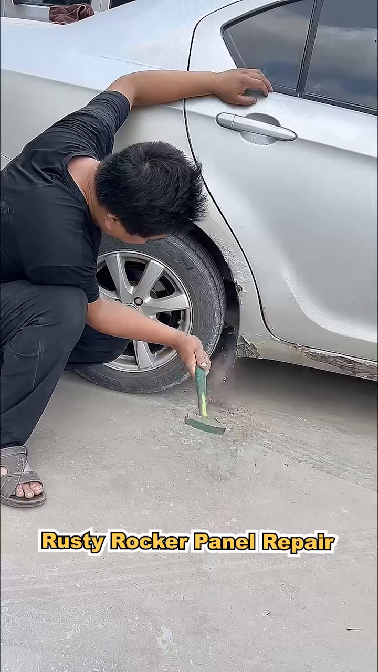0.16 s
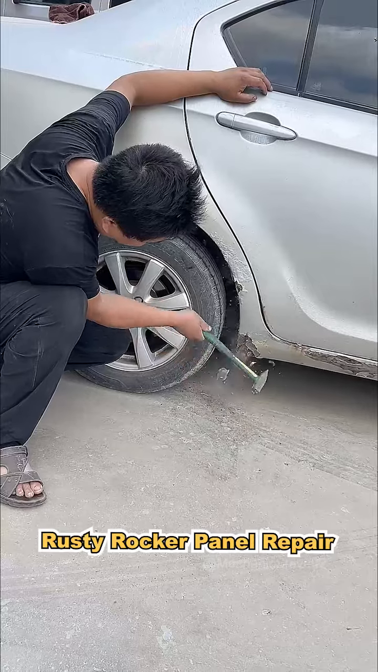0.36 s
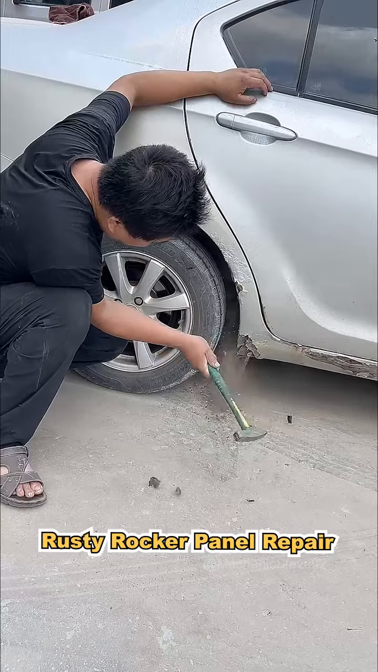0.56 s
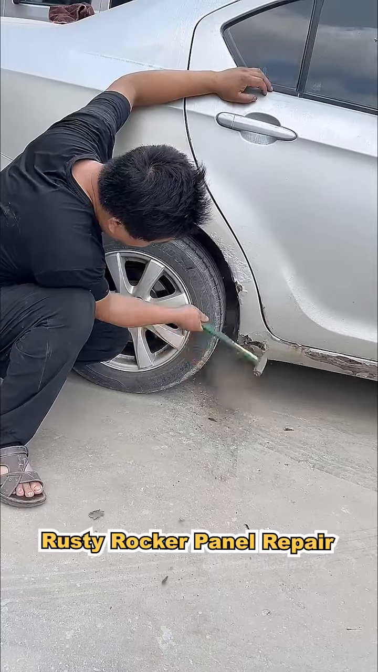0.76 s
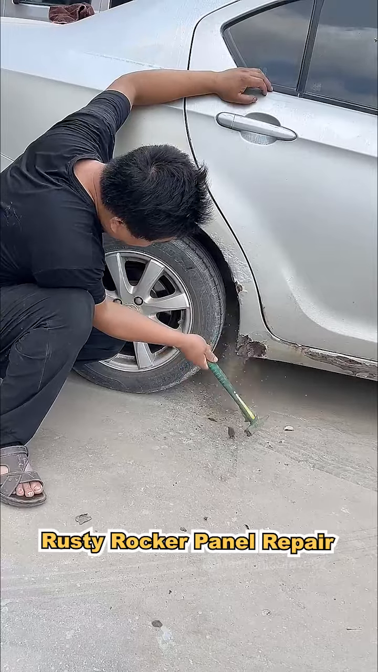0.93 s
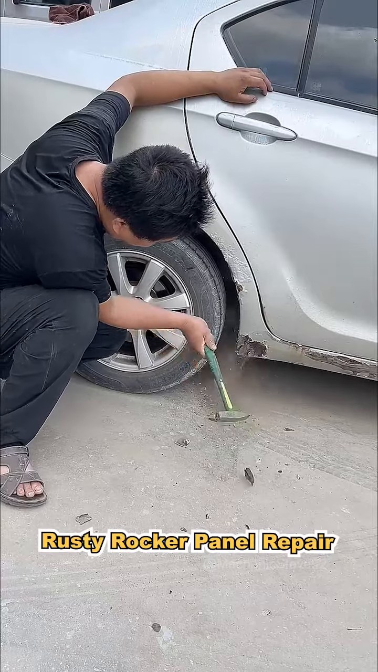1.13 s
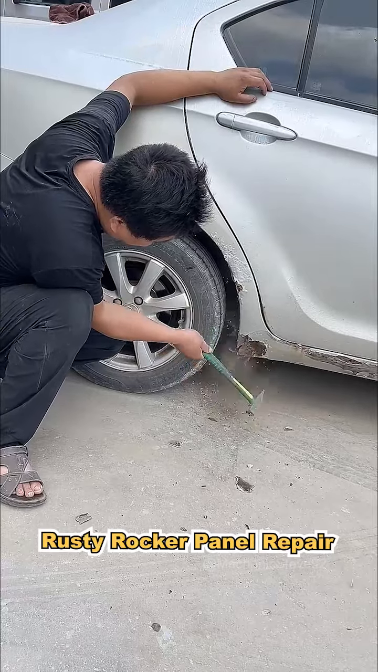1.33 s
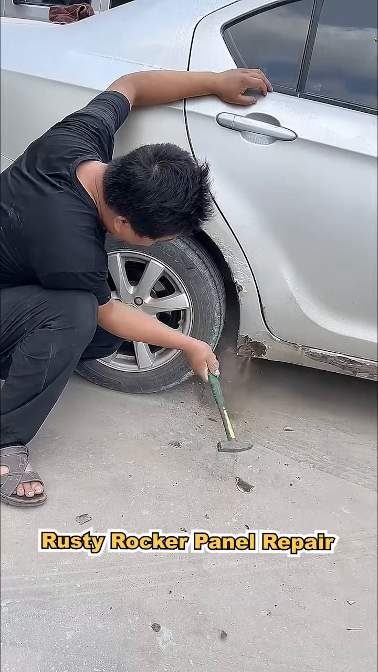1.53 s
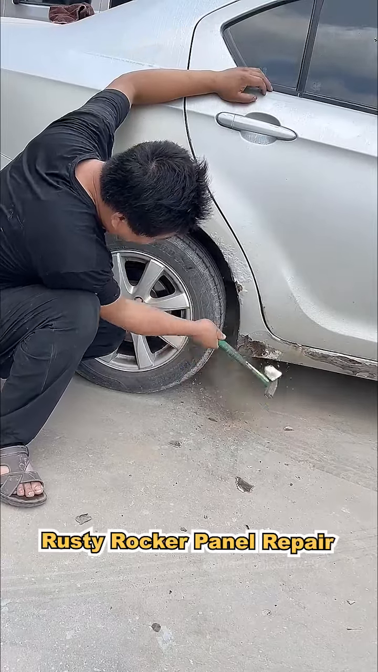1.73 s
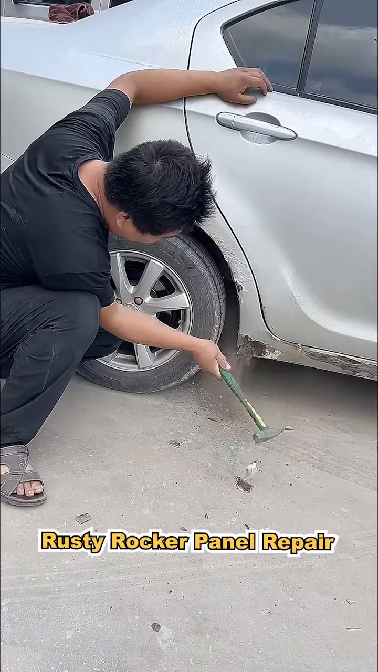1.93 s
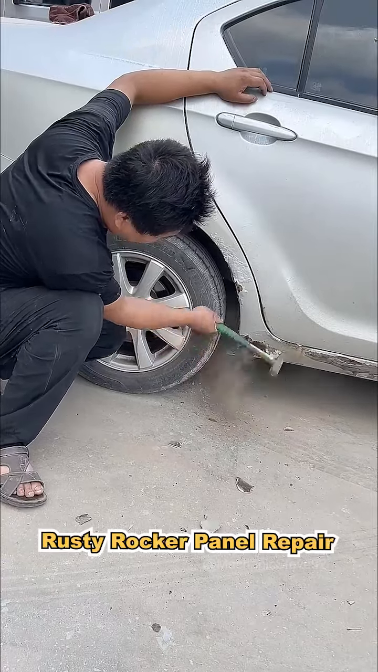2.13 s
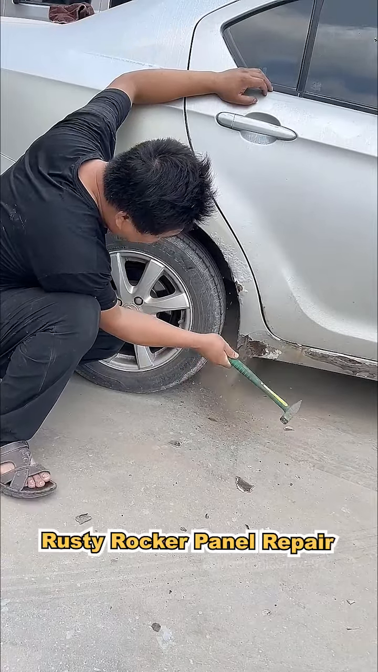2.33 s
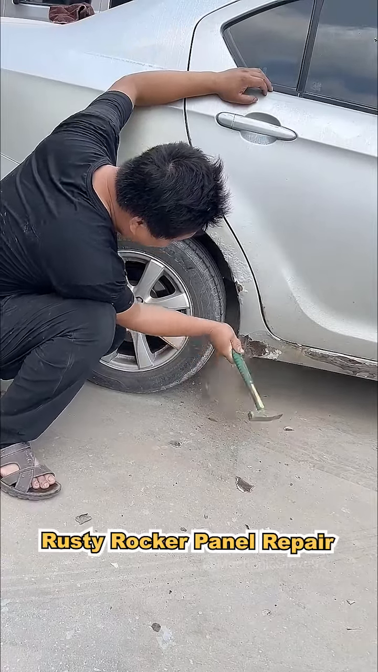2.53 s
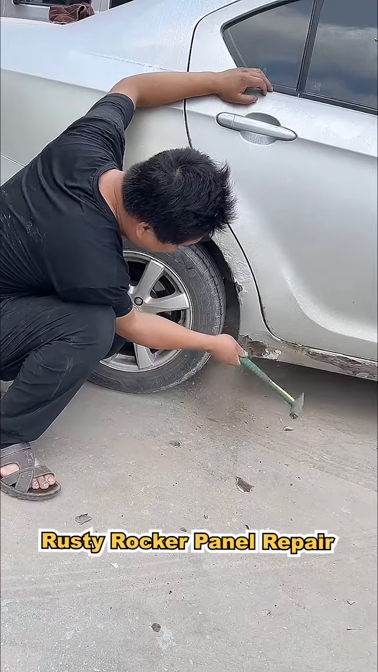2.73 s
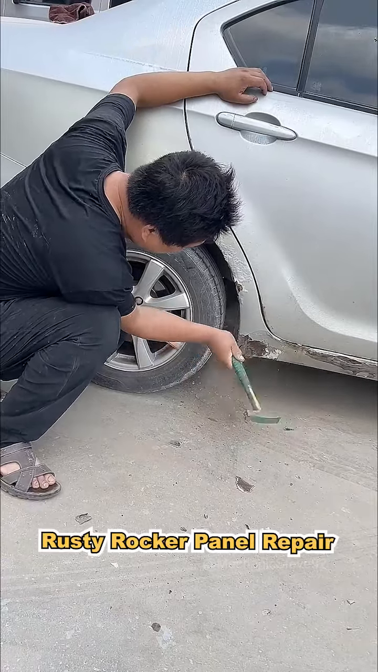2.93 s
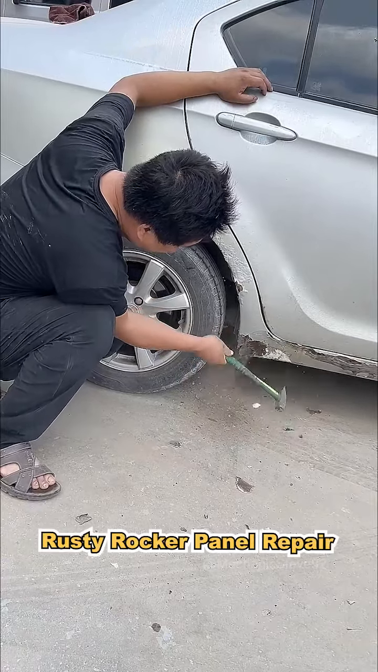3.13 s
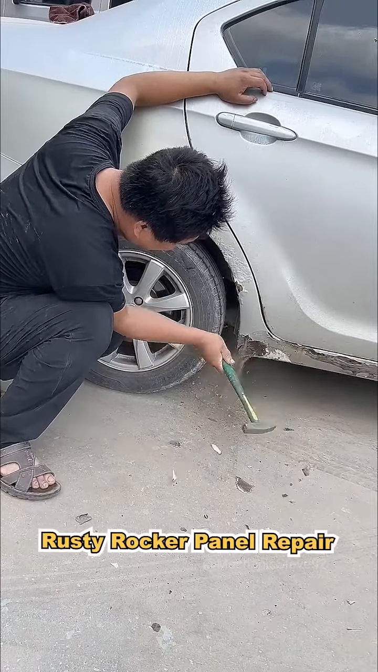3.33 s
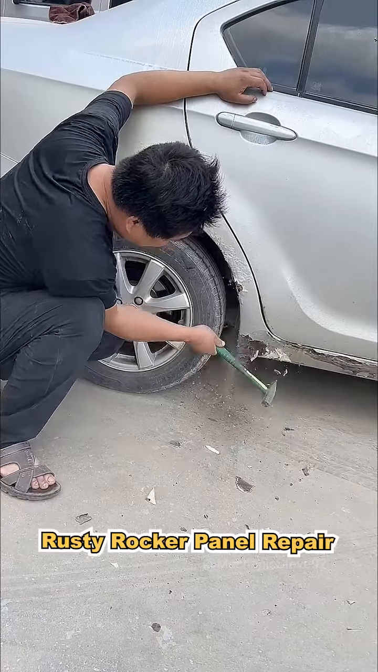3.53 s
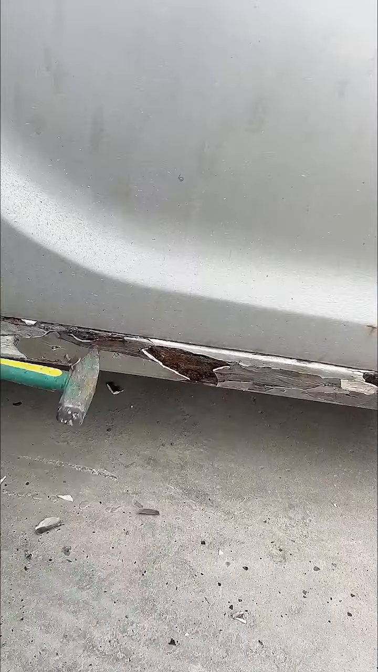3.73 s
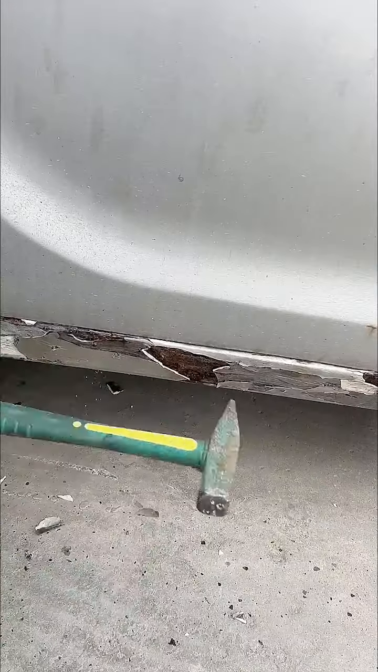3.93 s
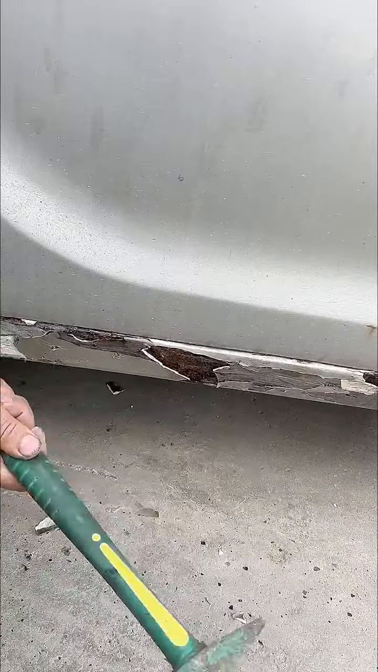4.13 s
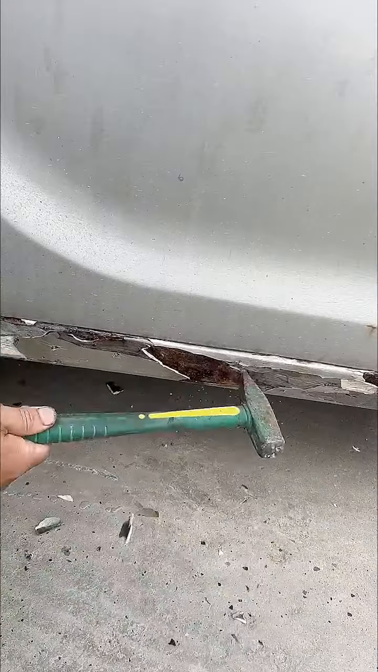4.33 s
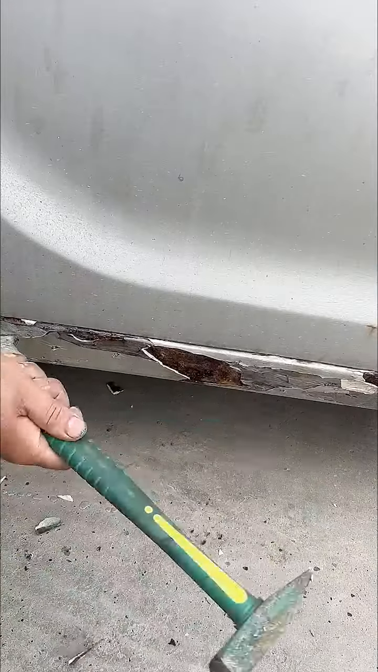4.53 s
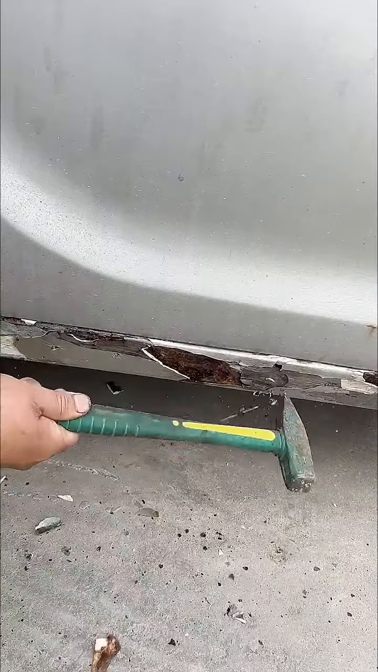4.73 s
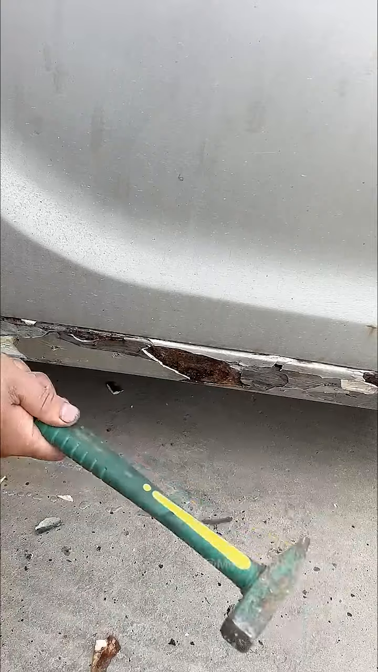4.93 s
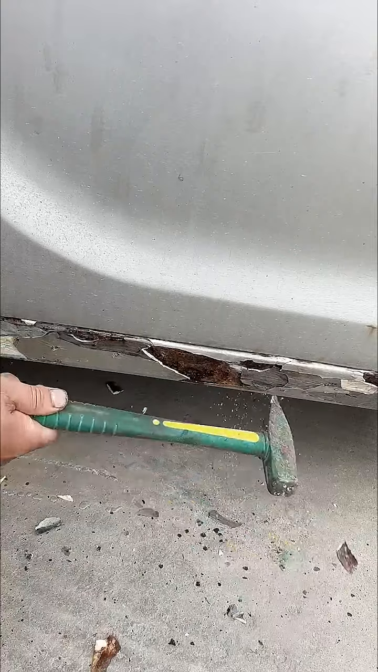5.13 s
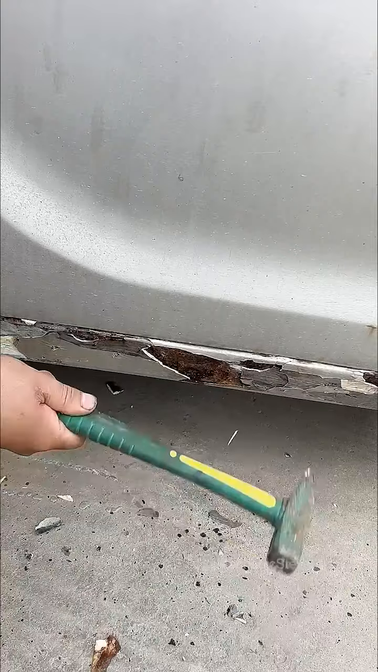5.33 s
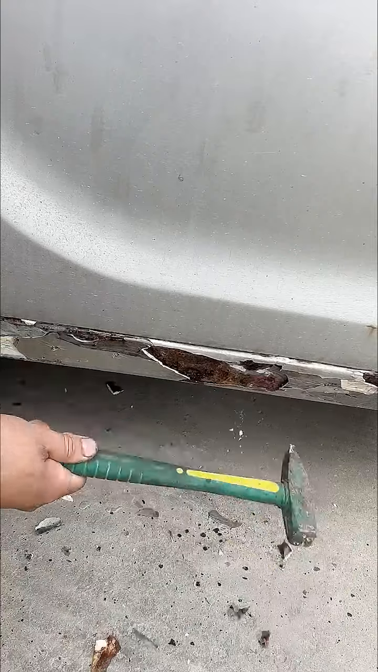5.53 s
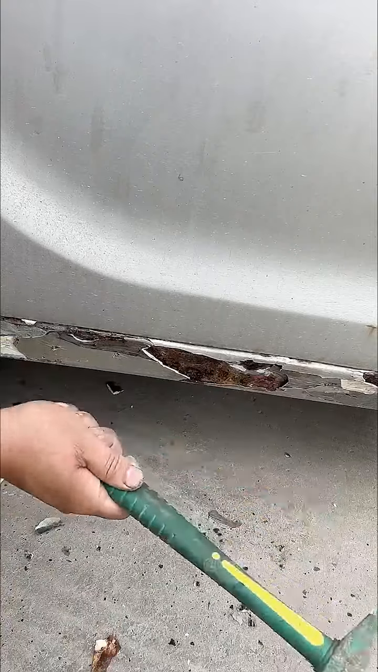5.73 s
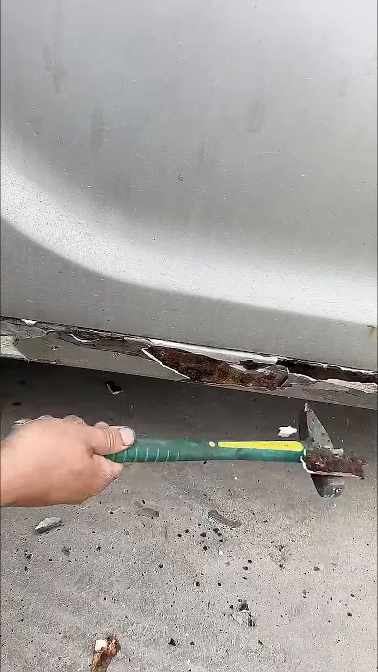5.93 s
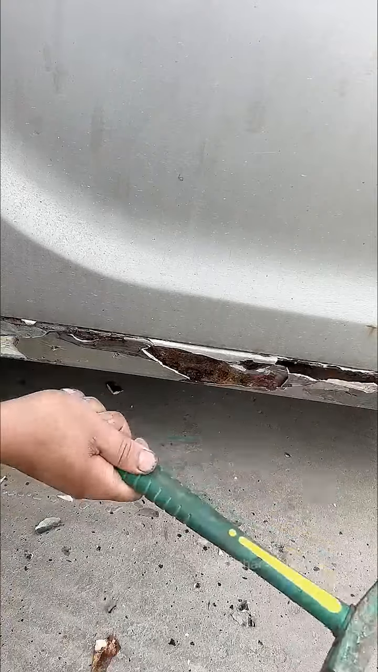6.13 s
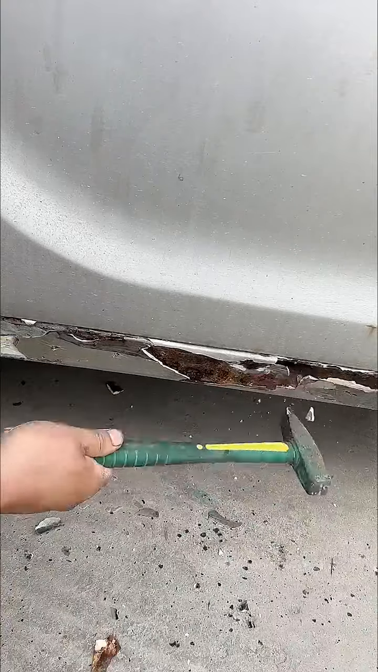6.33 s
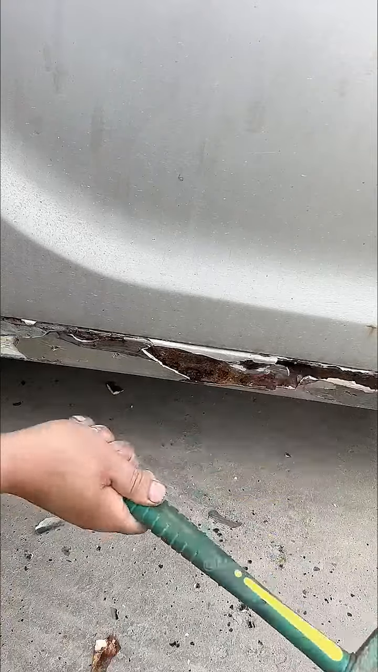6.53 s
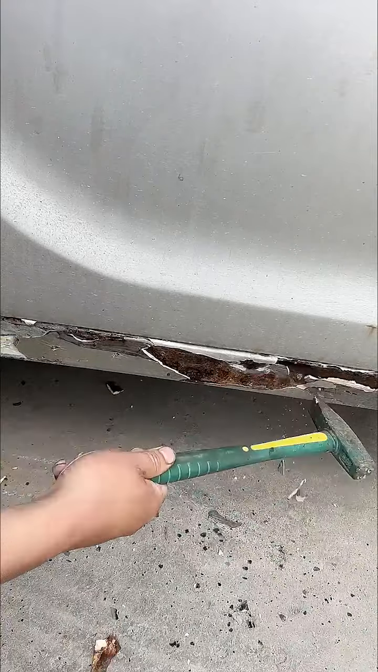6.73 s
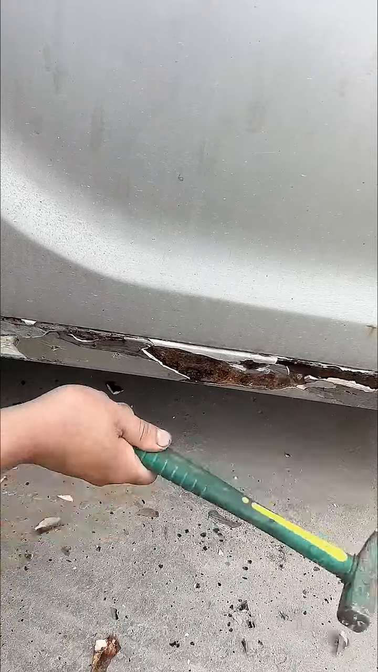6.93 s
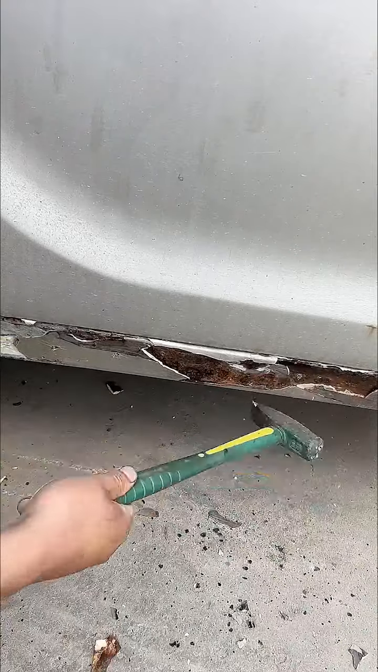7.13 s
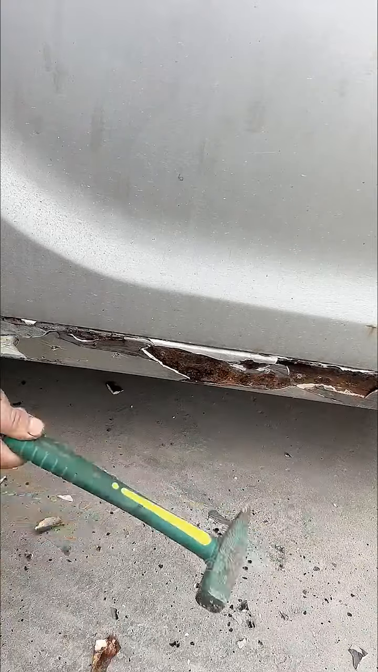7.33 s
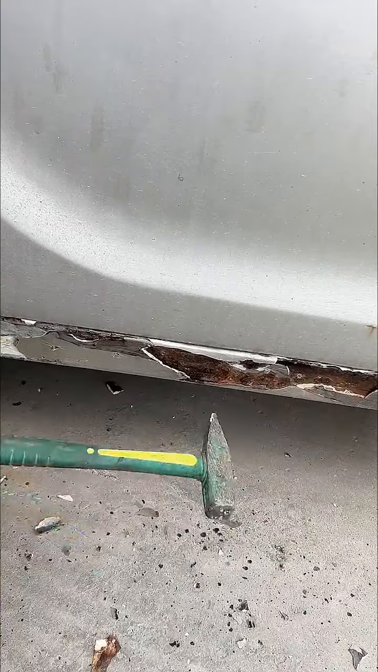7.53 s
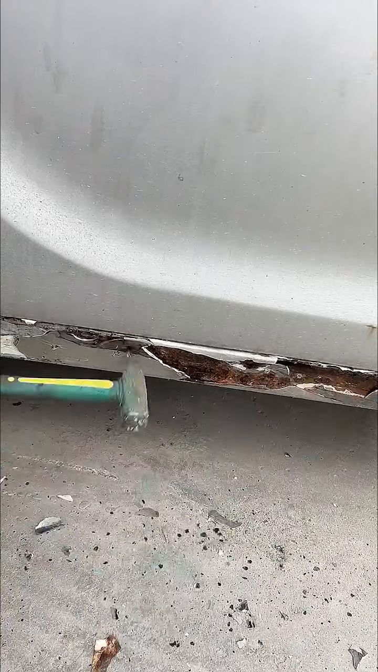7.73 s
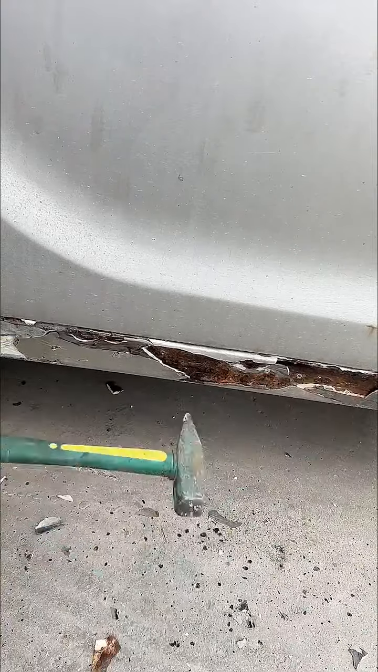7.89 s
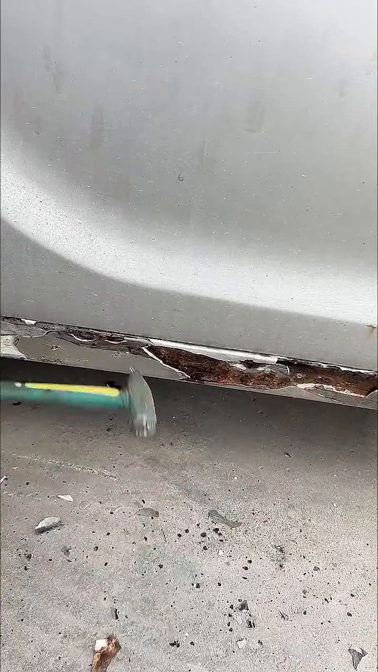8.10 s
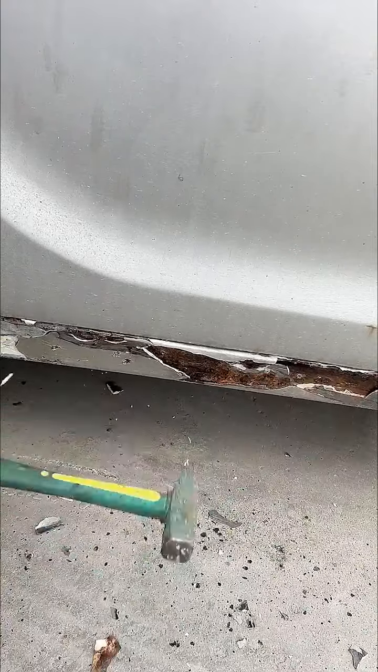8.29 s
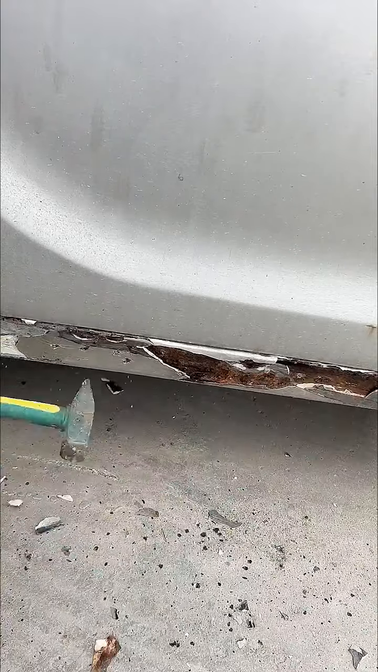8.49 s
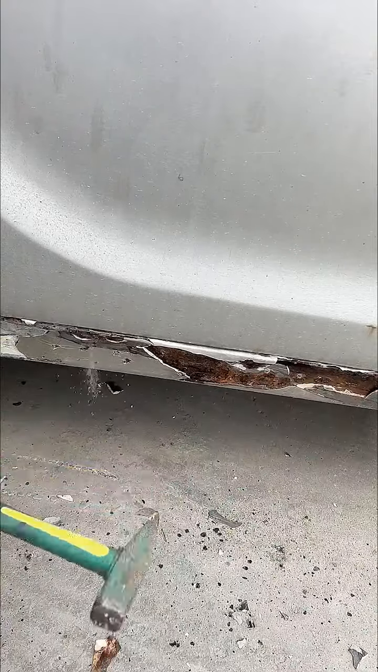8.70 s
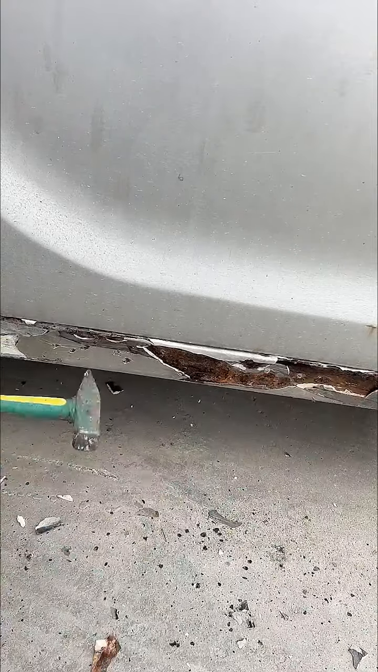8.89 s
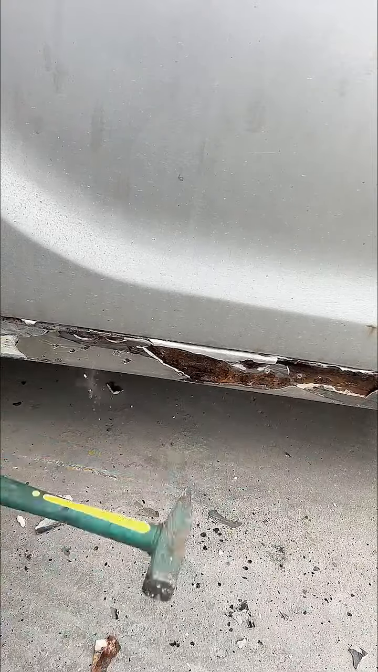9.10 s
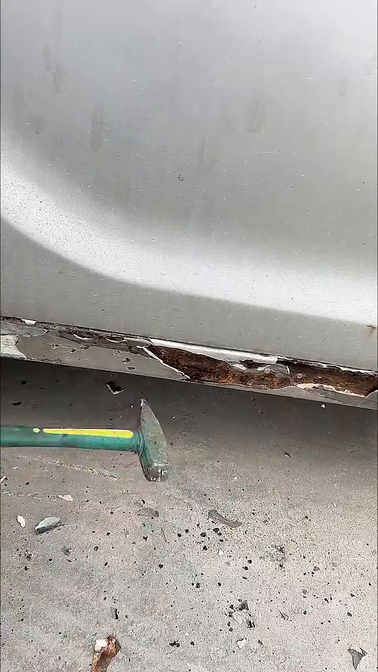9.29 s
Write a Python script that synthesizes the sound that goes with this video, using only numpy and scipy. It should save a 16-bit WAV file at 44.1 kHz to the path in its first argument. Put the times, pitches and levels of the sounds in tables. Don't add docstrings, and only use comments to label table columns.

```python
import sys
import numpy as np
from scipy import signal
from scipy.fft import rfft, irfft, next_fast_len
from scipy.io import wavfile
from scipy.ndimage import uniform_filter1d, map_coordinates

SR = 44100
rng = np.random.default_rng(int(sys.argv[2]) if len(sys.argv) > 2 else 0)


def put_to_file(sound):
    columns = np.atleast_2d(sound).T
    safe = np.clip(columns, -1, 1)
    whole_steps = np.round(safe * 32767)
    wavfile.write(sys.argv[1], SR, whole_steps.astype(np.int16))


def undo_db(level):
    steps = np.asarray(level, float) / 20
    return 10 ** steps


N = 412555
MOVE_S, FORWARD_S = 3.63, 7.3

# [t/s, force level/dB, clang re force level/dB, snap re force level/dB, clang f/Hz]
BLOWS = [ (3.7712, -16, 0.5, -2.5, 783), (4.2553, -17, 1, 5, 788), (4.6521, -13.5, -3, 5.5, 904),
         (5.0382, -15, -3.5, 7, 712), (5.4093, -13, 3, 3, 780), (5.8708, -11.5, -1.5, 5, 806),
         (6.2775, -13, 3.5, 7.5, 725), (6.6815, -11, -3, 0.5, 700), (7.041, -13, 1, 5, 750),
         (7.434, -12.5, -10.5, 1.5, 714), (7.78, -9.5, -1.5, 0.5, 759), (8.1551, -12.5, -7, 4, 690),
         (8.518, -8.5, -6, -2.5, 747), (8.8982, -8.5, -7, -3, 800), (9.2958, -11, -3, 1, 850)]
# [t/s, force level/dB, clang re force level/dB, snap re force level/dB, clang f/Hz]
SLAPS = [(3.8341, -21.5, -0.5, -7, 748), (6.347, -26, -7.5, 10, 1050), (7.1022, -21.5, 4.5, -1, 1023),
         (7.857, -28.5, 0, -1, 835), (8.216, -31, 2.5, 5, 820), (8.6049, -27.5, -11, -24.5, 750),
         (8.9953, -29.5, -2.5, -27.5, 744)]
# [t/s, force level/dB, snap re force level/dB, boom f/Hz, crust f/Hz]
CRUSTED_BLOWS = [(0.351, -19, 3, 240, 1430), (0.817, -20.5, 7, 251, 1590), (1.266, -17.5, 1.5, 120, 1513),
                 (1.7446, -15, 3, 162, 1560), (2.185, -16.5, 7.5, 235, 1504), (2.654, -15.5, 8, 224, 1536),
                 (3.0845, -15, 4.5, 248, 1750), (3.504, -13.5, 0.5, 250.5, 2075)]
# [boom f/Hz, crust f/Hz, rattle re force level/dB, rattle length/%, grit re
# force level/dB]
PLACES = [
    (240, 1540, -17, 230, -27.5),
    (223.7, 1950, -17, 114, -38),
    (247.3, 2300, -21, 119, -44.5),
]
BOOM_LAG_S = (0.00696, 0.00501, 0.00396)
PING_DB = (-0.5, -7, -7.5)
BODY_DB = (-2.0, -2.5, -4)
# [f/Hz, level/dB, time to fall 60 dB/s]
BODY_REAR = [(112.7, 1.5, 0.2), (153.5, -5.5, 0.31), (218.2, -9.5, 0.34), (262.8, -5.5, 0.25),
             (352.4, -6, 0.2)]
# [f/Hz, level/dB, time to fall 60 dB/s]
BODY_MID = [(96.7, -10, 0.25), (150.8, 0, 0.29), (223.7, -8, 0.19), (326, -10.5, 0.13)]
# [f/Hz, level/dB, time to fall 60 dB/s]
BODY_FRONT = [(83.6, -18, 0.51), (152.6, -1.5, 0.16), (232.9, -3.5, 0.19), (337, -13.5, 0.21)]
# [f/Hz, level per Hz/dB]
CRUNCH_COLOUR = [(710, 0), (1200, -3), (4830, -10.5), (6080, -15.5), (7660, -18.5), (10200, -22.5),
                 (11400, -36.5), (15100, -23), (16500, -67)]
# [f/Hz, level per Hz/dB]
RATTLE_COLOUR = [(110, -12), (200, 0), (330, -11), (500, -9), (760, -15), (1100, -18.5), (1700, -23.5),
                 (3000, -36.5), (5500, -41.5), (9500, -42), (11300, -53.5), (14500, -50), (15900, -85)]
# [f/Hz, time to fall 60 dB/s]
RATTLE_T60 = [(200, 0.28), (800, 0.11), (2500, 0.13), (7000, 0.069), (14000, 0.044)]
# [f/Hz, level per Hz/dB]
GRIT_COLOUR = [(800, -21), (2000, 6), (5000, -4), (9500, -8.5), (11300, -21.5), (14500, -14), (15800, -19),
               (16000, -57.5)]
# [delay/s, spread/s, level/dB]
WALLS = [(.065, 0.027, -15), (0.099, 0.013, -18.5)]
# [t/s, peak level/dB, treble re
# peak level/dB]
FLAKES_REAR = [(0.2866, -35, -11), (0.534, -36, -8), (0.553, -38, -9), (0.6144, -48, -12),
               (0.8694, -32.5, -31), (0.9544, -44, -17), (0.9921, -44, -27), (1.0765, -39, -17),
               (1.0938, -32, -17), (1.114, -42, -6), (1.1712, -47, -19), (1.2844, -39, -13),
               (1.8287, -36, -22), (1.9545, -31.5, -20), (2.1344, -40.5, -26), (2.157, -36, -7),
               (2.585, -32, -28), (2.6144, -54, 15), (3.1394, -46, -10), (3.236, -32, -3.5),
               (3.265, -35.5, -19.5), (3.2744, -38, -10), (3.515, -35, -18), (3.92, -55, -9),
               (3.9639, -46, -7), (4.0931, -51, -15), (0.2774, -50, -8), (1.35, -50, -30)]
# [t/s, peak level/dB, treble re peak level/dB]
FLAKES_CLOSE = [(4.3912, -32.5, 1.5), (4.449, -41, -24), (4.4596, -32.5, -29), (4.7216, -38, -22),
                (4.9067, -44, -5), (5.2975, -36.5, -13), (5.4932, -24, -25), (5.5167, -32, 4),
                (5.5525, -48, -12), (5.5614, -44, -16), (5.6246, -34, -5), (5.648, -51, -7),
                (5.6655, -32, -9), (5.7229, -47, -19), (5.7745, -42.5, -16), (5.9502, -27, -24),
                (5.959, -29, -24), (5.984, -32.5, -12), (6.4238, -42, -4), (6.494, -43.5, -17),
                (6.5245, -38.5, -1), (6.5826, -31.5, -19), (6.616, -45, -9), (6.6707, -31, -15),
                (6.7421, -45, -26), (6.8642, -45.5, -21), (7.277, -29, -4), (7.3946, -43, -13),
                (7.955, -43, -3), (9.091, -45.5, -12)]
# [f/Hz, level per Hz/dB]
DUST_COLOUR = [(9500, -20), (11000, -9.5), (12500, -8.5), (14500, -3.5), (15750, 0.5), (15950, -47.5)]
# [f/Hz, level/dB, fade/dB per s]
METAL_TONES = [(7270, -59.5, 67), (10425, -68.5, 170), (14480, -62, 130)]
# [t/s, level/dB]
TRAFFIC = [(0.0, -49.5), (0.26, -53), (0.57, -48.5), (1.12, -47), (1.59, -42), (1.83, -38.5), (2.08, -42),
           (2.85, -40), (3.46, -40), (3.62, -39), (3.64, -49.5), (4.1, -48.5), (4.8, -52.5), (6.22, -51),
           (7.25, -49.5), (7.79, -50.5), (7.98, -48), (9.35, -50.5)]
# [rumble re roar level/dB, hiss re roar level/dB, dust floor level/dB]
ROAD_MIX = [
    (0.5, -15, -74),
    (6.5, -18.5, -91),
]
# [t/s, level/dB, width/s]
RUMBLE_SWELLS = [(2.08, 5, 0.1), (3.91, 10.5, 0.048), (4.2, -4.5, 0.29), (6.22, -1, 0.12), (7.98, 1.5, 0.34)]
# [f/Hz, level per Hz/dB]
RUMBLE_COLOUR = [(13, -42.5), (22, -17), (38, -0.5), (70, 2.5), (107, 0), (260, -16), (300, -16),
                 (390, -13), (660, -120)]
# [f/Hz, level per Hz/dB]
ROAR_COLOUR = [(88, -20), (150, -0.5), (192, -5), (263, -0.5), (337, -8.5), (450, -8), (1040, -9.5),
               (1230, -14), (2040, -20.5), (2610, -23), (4000, -40), (5200, -71), (8800, -120)]
# [f/Hz, level per Hz/dB]
ROAR_LOW_COLOUR = [(88, -32), (150, -6.5), (246, -7), (400, -15.5), (600, -19), (780, -17.5), (1100, -20),
                   (2500, -29), (4000, -42.5), (6000, -53), (9000, -93)]
# [f/Hz, level per Hz/dB]
HISS_COLOUR = [(1500, -24), (2600, 1), (4500, -6.5), (8700, -11.5), (10200, -15.5), (11500, -43),
               (14000, -73)]


def hammer():
    out = np.zeros(N + SR)
    t = np.arange(10240) / SR
    short_t = t[:4096]
    for s, force_db, clang_db, snap_db, clang_hz, boom_hz, crust_hz, place, slap in contacts():
        rattle_db, length, grit_db = PLACES[place][2:]
        late = np.clip(t - BOOM_LAG_S[place], 0, None)

        clang = sheet_clang(t, clang_hz)
        blow = undo_db(force_db + clang_db + 9) * clang
        blow = blow + undo_db(force_db + 9.5) * patch_boom(late, boom_hz)
        blow = blow + undo_db(force_db + BODY_DB[place]) * body_boom(t, late, place)
        shake = rattle(t, length) * undo_db(2.7 * flutter(t, rate=118))
        blow = blow + undo_db(force_db + rattle_db + slap * 4 + 7.5) * shake
        blow = blow / (1 + (t / 0.14) ** 6)

        lost_clang = (1 - undo_db(-14)) * undo_db(force_db + clang_db + 8.5) * clang
        echo_db = 1.5 if s < MOVE_S else -3.5
        blow = blow + undo_db(echo_db) * yard((blow - lost_clang) * undo_db(-150 * t))
        powder = undo_db(force_db + grit_db - slap * 17) * grit(t, swell_s=0.029)

        crunch_db = force_db + 6.5 + 0.11 * clang_db + 0.1 * snap_db - slap * 5
        crack = undo_db(crunch_db - 2.0) * rust_crunch(short_t, crust_hz, place)
        crack = crack + undo_db(force_db + snap_db - 4.0) * rust_snap(short_t)
        start = round(s * SR)
        out[start:][:len(t)] += blow + powder
        out[start:][:len(short_t)] += crack
    since_move = np.arange(N) / SR - MOVE_S
    return out[:N] * np.interp(since_move, [-.008, 0, .13, .131], [1, 0, 0, 1])


def contacts():
    for s, force_db, snap_db, boom_hz, crust_hz in CRUSTED_BLOWS:
        clang_db, clang_hz = -7.5, 740
        yield s, force_db, clang_db, snap_db, clang_hz, boom_hz, crust_hz, 0, False
    for row in BLOWS + SLAPS:
        place = int(row[0] > MOVE_S) + int(row[0] > FORWARD_S)
        slap = row in SLAPS
        boom_hz, crust_hz = PLACES[place][:2]
        boom_hz = boom_hz * 0.792 ** slap * np.exp(0.032 * rng.standard_normal())
        crust_hz = crust_hz * np.exp(0.21 * rng.standard_normal())
        yield *row, boom_hz, crust_hz, place, slap


def snap_share(hz):
    return 1 / (1 + (4800 / (hz + 1)) ** 4)


def rust_crunch(t, crust_hz, place):
    def colour(hz):
        return undo_db(along(CRUNCH_COLOUR, hz)) * (1 - snap_share(hz)) / (1 + (550 / (hz + 1)) ** 4)

    crunch = burst(t, colour, t60=0.03, attack=0.00057, grain_db=5.0)
    ping = ring(t, crust_hz, t60=0.017, attack=0.00095)
    ping = ping + 0.81 * ring(t, 2.05 * crust_hz, t60=0.011, attack=0.00038)
    return crunch + undo_db(PING_DB[place]) * ping


def rust_snap(t):
    def colour(hz):
        return undo_db(along(CRUNCH_COLOUR, hz)) * snap_share(hz)

    return burst(t, colour, t60=0.02, attack=0.00012, grain_db=5.5)


def sheet_clang(t, clang_hz):
    def neighbours(hz):
        return 1 / (1 + ((hz - 1.09 * clang_hz) / 220) ** 4)

    clang = ring(t, clang_hz, t60=0.033, attack=0.00096)
    clang = clang + undo_db(-9) * burst(t, neighbours, t60=0.065, attack=0.00063, grain_db=2.5)
    return clang * undo_db(1.66 * flutter(t, rate=300))


def patch_boom(late, boom_hz):
    low = ring(late, boom_hz, t60=0.044, attack=0.43 / boom_hz)
    return low - 0.3 * ring(late, 1.33 * boom_hz, t60=0.034, attack=.55 / boom_hz)


def body_boom(t, late, place):
    boom = 0
    for k, (hz, level_db, t60) in enumerate((BODY_REAR, BODY_MID, BODY_FRONT)[place]):
        loud_luck, pitch_luck = rng.standard_normal(2)
        gain = undo_db(level_db + 1.8 * loud_luck + 2.2 * flutter(t, rate=43.6))
        note = ring(late, hz * (1 + 0.023 * pitch_luck), t60, attack=0.66 / hz)
        boom = boom + (-1) ** k * gain * note
    return boom


def rattle(t, length):
    hz, frame_s, z = signal.stft(rng.standard_normal(len(t)), SR, nperseg=128)
    t60 = length / 100 * along(RATTLE_T60, hz)[:, None]
    shaped = z * undo_db(along(RATTLE_COLOUR, hz)[:, None] - 60 * frame_s / t60)
    x = signal.istft(shaped, SR, nperseg=128)[1][:len(t)]
    start_rms = np.sqrt(np.mean(x[:SR // 50] ** 2))
    return x / start_rms * (1 - np.exp(-t / 0.0022))


def grit(t, swell_s):
    def gain(hz):
        return undo_db(along(GRIT_COLOUR, hz))

    swell = t / swell_s * np.exp(1 - t / swell_s)
    grains = rng.standard_normal(len(t)) * undo_db(3.0 * flutter(t, rate=640)) * swell
    return coloured(grains, gain) / np.sqrt(np.mean(gain(np.fft.rfftfreq(len(t), 1 / SR)) ** 2))


def yard(x):
    t = np.arange(7000) / SR
    cloud = 0
    for delay, spread, db in WALLS:
        cloud = cloud + undo_db(db) * np.exp(-((t - delay) / spread) ** 2) / np.sqrt(spread * SR)
    return signal.fftconvolve(x, cloud * rng.standard_normal(len(t)))[:len(x)]


def flakes():
    out = np.zeros(N + SR)
    t = np.arange(2048) / SR
    for s, db, treble_db in FLAKES_REAR + FLAKES_CLOSE:
        colour = [(1500, -11.5), (3500, -6.5), (6500, -8), (9500, 2.0 + treble_db / 2),
                  (11000, -7.5 + treble_db), (14500, 5.0 + treble_db), (16300, -49)]
        t60 = .013 * np.exp(.25 * rng.standard_normal())
        tick = burst(t, lambda hz: undo_db(along(colour, hz)), t60, attack=0.00017, grain_db=7.0)
        out[round(s * SR):][:len(t)] += undo_db(db - 2.0) * tick
    return out[:N]


def trickle():
    coarse = np.arange(0, N / SR + 1, .01)
    falling = sum(np.exp(-((coarse - s) / 0.16) ** 2 / 2) for s, _, _ in FLAKES_CLOSE)
    return np.interp(np.arange(N) / SR, coarse, falling)


def crumbs():
    per_s, level_db, spread_db = 9, -60, 4.5
    lands = rng.random(N) < per_s / SR * np.minimum(trickle(), 4)
    hits = lands * undo_db(level_db + spread_db * rng.standard_normal(N))
    fade = undo_db(-60 * np.arange(400) / SR / .007)
    puffs = signal.fftconvolve(hits, fade)[:N] * rng.standard_normal(N)
    return coloured(puffs, lambda hz: (hz < 15700) / (1 + (6000 / (hz + 1)) ** 4))


def dust():
    level_db = by_place(ROAD_MIX)[2] + 3.5 * np.minimum(trickle(), 3)
    uneven_db = 2.5 * wobble(60) + 2.5 * wobble(8)
    return undo_db(level_db - 1.5 + uneven_db) * rush(DUST_COLOUR, patchy_db=1)


def metal_ring():
    hold_s, end_s = 0.078, 0.5
    t = np.arange(N) / SR - MOVE_S
    fading = np.clip(t - hold_s, 0, None)
    tones = 0
    for hz, db, fade in METAL_TONES:
        pitch = hz * (1 + .006 * np.exp(-np.abs(t) / .04) + .0022 * wobble(300))
        level = np.sqrt(2) * undo_db(db - fade * fading + 3.8 * wobble(120))
        tones = tones + level * np.sin(2 * np.pi * np.cumsum(pitch) / SR)
    pad = undo_db(-55.5 - 100 * fading) * rush(GRIT_COLOUR, patchy_db=2.0)
    return (t > 0) * (t < end_s) * (tones + pad)


def road():
    t = np.arange(N) / SR
    roar_db, = curves(TRAFFIC)
    rumble_db, hiss_db, _ = by_place(ROAD_MIX)
    usual_db = roar_db.mean()
    rumble_db = rumble_db + usual_db + 0.79 * (roar_db - usual_db)
    rumble_db = rumble_db + sum(db * swell_at(s, width_s) for s, db, width_s in RUMBLE_SWELLS)
    swell = .7 * wobble(3.31)
    rumble = undo_db(rumble_db + 0.41 * wobble(12)) * rush(RUMBLE_COLOUR, patchy_db=-3.0)
    by_wheel, by_sill = rush(ROAR_COLOUR, patchy_db=.8), rush(ROAR_LOW_COLOUR, patchy_db=.8)
    roar = undo_db(roar_db + swell) * np.where(np.arange(N) < MOVE_S * SR, by_wheel, by_sill)
    hiss = undo_db(roar_db + hiss_db + swell * .8 / .7) * rush(HISS_COLOUR, patchy_db=1)
    engine = undo_db(-29) * swell_at(2.024, width_s=0.067) * np.sin(2 * np.pi * 106 * t)
    return rumble + roar + hiss + engine


def ring(t, hz, t60, attack):
    return np.sin(2 * np.pi * hz * t) * undo_db(-60 * t / t60) * (1 - np.exp(-t / attack)) ** 2


def burst(t, gain, t60, attack, grain_db):
    luck = np.repeat(rng.standard_normal(len(t) // 24 + 1), 24)[:len(t)]
    late = np.clip(t - .002, 0, None)
    shape = undo_db(-60 * late / t60) * (1 - np.exp(-late / attack))
    x = coloured(rng.standard_normal(len(t)) * undo_db(grain_db * luck) * shape, gain)
    peak = np.sqrt(np.max(uniform_filter1d(x ** 2, size=66)))
    return np.pad(x[88:], (0, 88)) / peak / 2


def rush(spectrum, patchy_db):
    z = signal.stft(rng.standard_normal(N + 8192), nperseg=512)[2]
    field = uniform_filter1d(rng.standard_normal(z.shape), size=6, axis=0)
    field = uniform_filter1d(field, size=12, axis=1)
    x = signal.istft(z * undo_db(patchy_db * unit(field)), nperseg=512)[1][:next_fast_len(N)]
    return unit(coloured(x, lambda hz: undo_db(along(spectrum, hz)))[:N])


def coloured(x, gain):
    return irfft(rfft(x) * gain(np.fft.rfftfreq(x.shape[-1], 1 / SR)), x.shape[-1])


def along(points, hz):
    f, v = np.transpose(points)
    return np.interp(np.log(hz + 1), np.log(f + 1), v)


def curves(rows):
    s, *cols = np.transpose(rows)
    return [np.interp(np.arange(N) / SR, s, c, left=c[0]) for c in cols]


def by_place(rows):
    return np.array(rows)[(np.arange(N) > MOVE_S * SR).astype(int)].T


def swell_at(s, width_s):
    return np.exp(-((np.arange(N) / SR - s) / width_s) ** 2 / 2)


def wobble(rate):
    return map_coordinates(rng.standard_normal(int(N * rate / SR) + 4), [np.arange(N) * rate / SR])


def flutter(t, rate):
    knots = np.arange(0, t[-1] + 2 / rate, 1 / rate)
    return np.interp(t, knots, rng.standard_normal(len(knots)))


def unit(x):
    return x / np.sqrt(np.mean(x ** 2) + 1e-20)


def scene():
    return (hammer() + flakes() + crumbs() + dust() + metal_ring() + road())[None]


def roll_off(x):
    return signal.sosfilt(signal.butter(12, 17050, fs=SR, output="sos"), x)


def record(dry):
    thin = coloured(dry, lambda hz: 1 / (1 + (37 / (hz + 1)) ** 6))
    soft = thin / (1 + np.abs(thin / .7) ** 4) ** (1 / 4)
    return roll_off(soft)


dry = scene()
out = record(dry)
put_to_file(out)
```